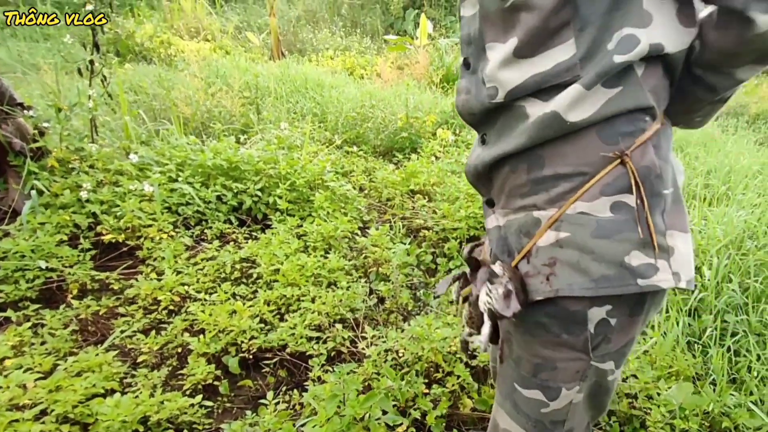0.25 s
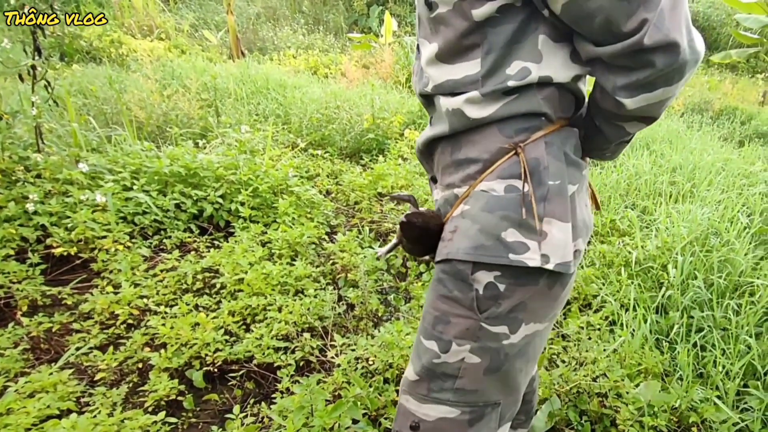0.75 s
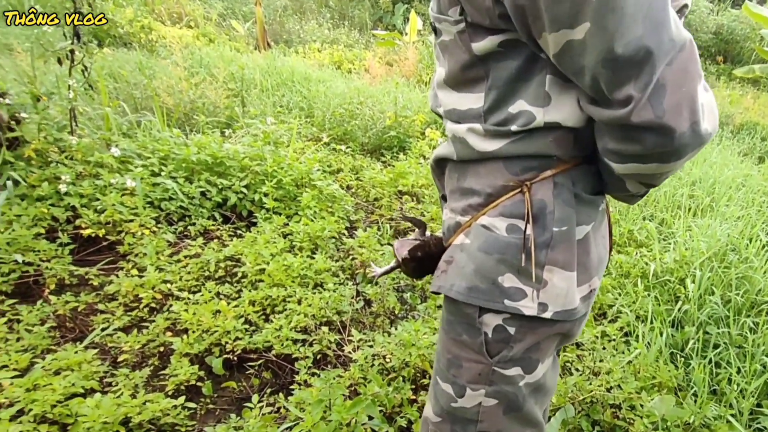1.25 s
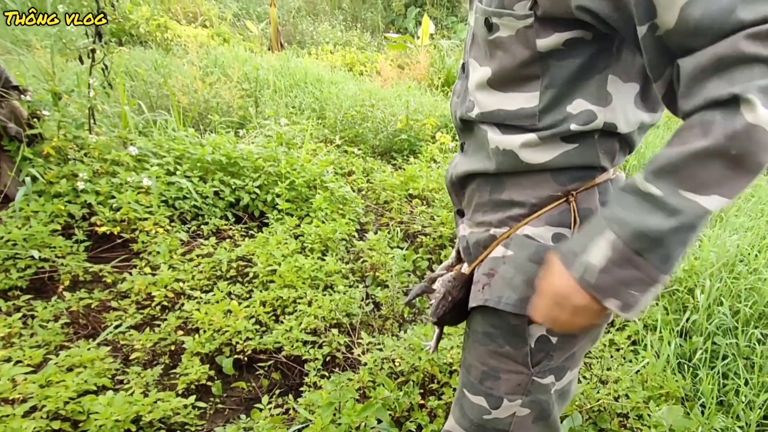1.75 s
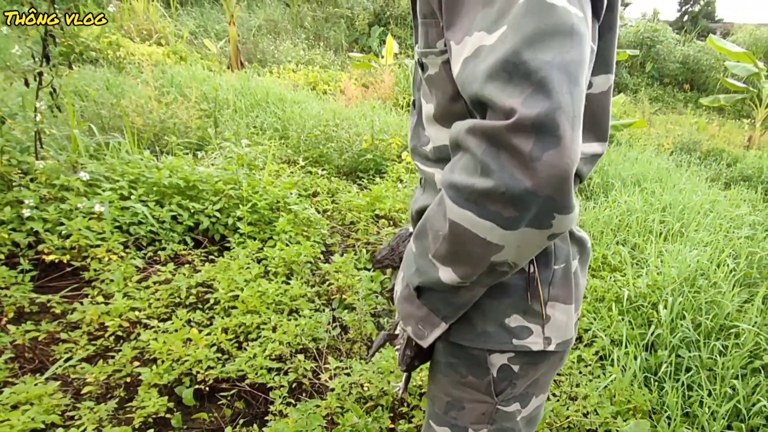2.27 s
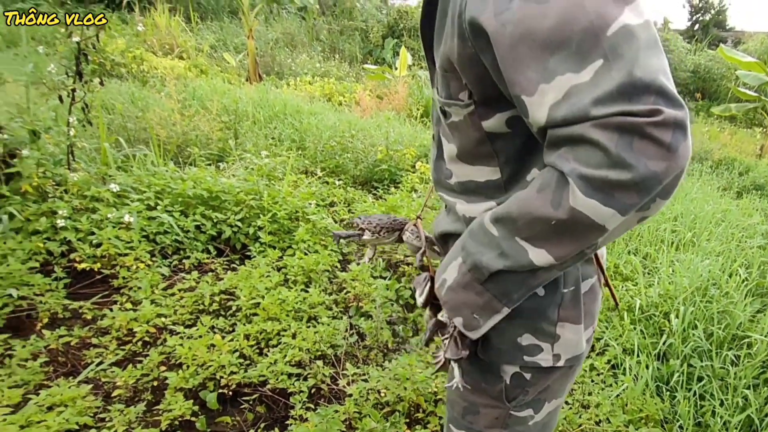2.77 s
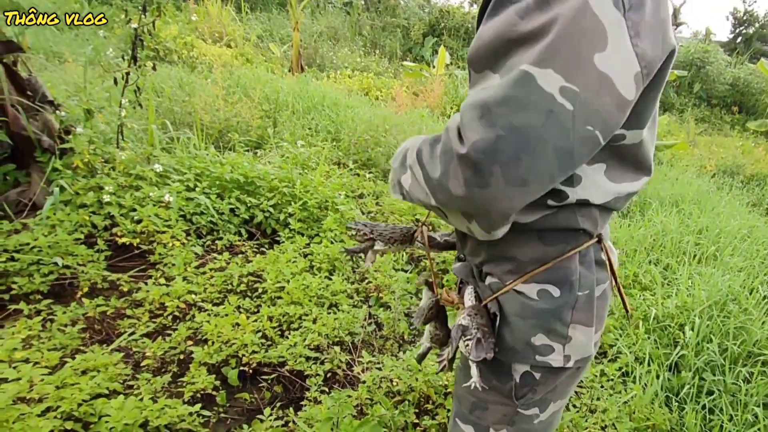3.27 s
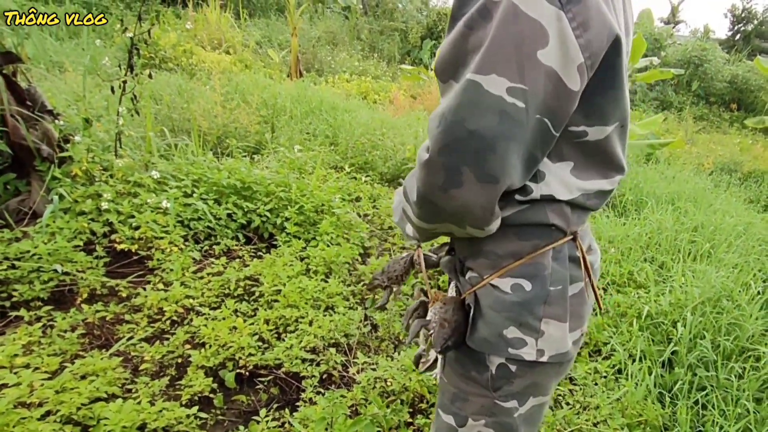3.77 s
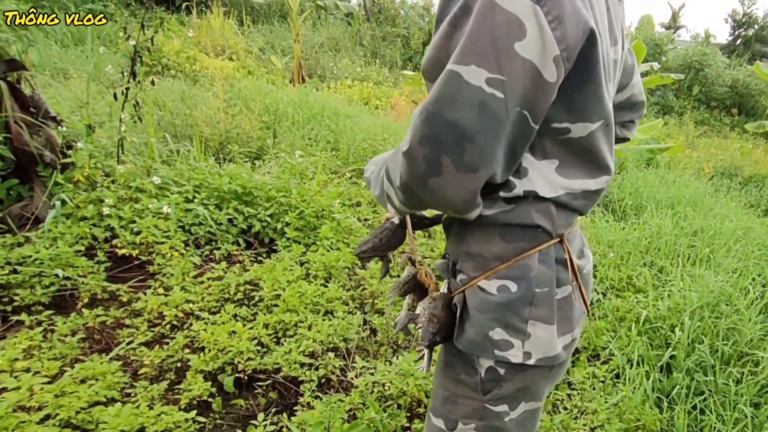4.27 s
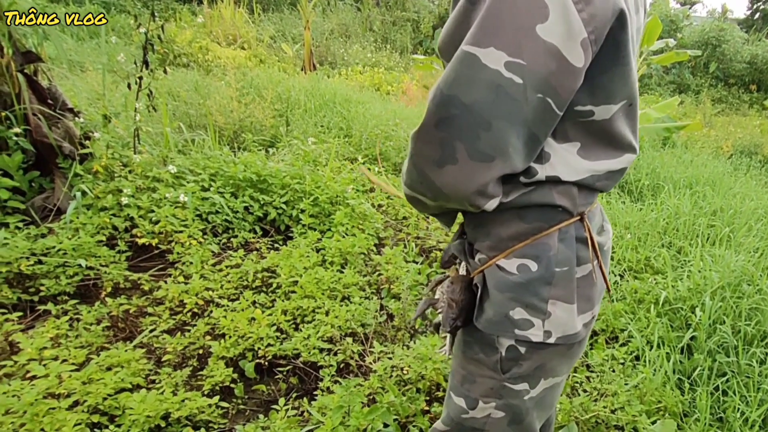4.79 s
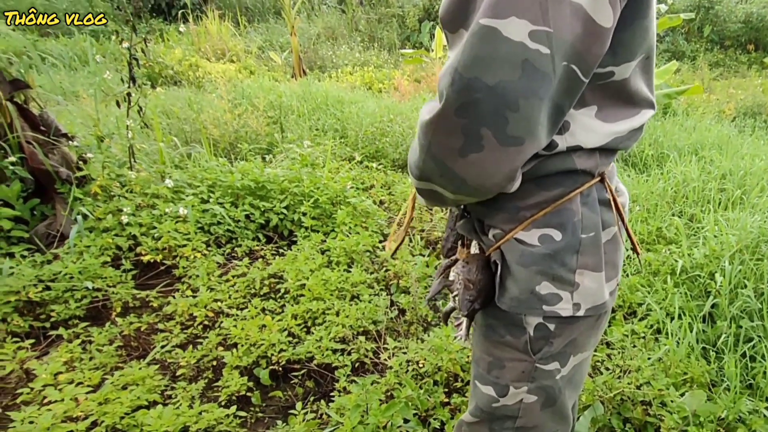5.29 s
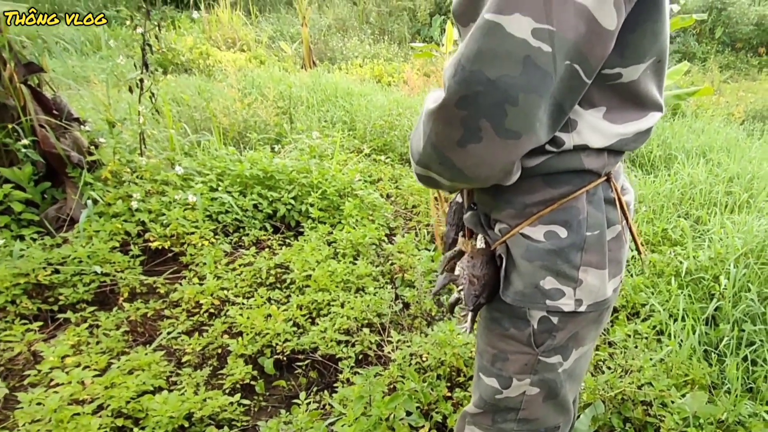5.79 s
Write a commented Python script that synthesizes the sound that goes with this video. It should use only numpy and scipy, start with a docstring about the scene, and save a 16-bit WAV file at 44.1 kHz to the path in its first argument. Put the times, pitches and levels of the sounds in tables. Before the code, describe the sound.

Right at the start, a captured frog screams close to the microphone: a loud, wavering cry of about half a second that opens up bright, then sinks into a creak. A soft falling squeak follows at 0.7 seconds. Clothing brushes around 0.9 seconds, and a cord and stems tick twice. The frog screams again from 1.1 to 1.6 seconds, ending raspier, and squeaks once more. After a few light ticks and a faint cloth rustle, the third and longest scream runs from 2.8 to 3.5 seconds, trailed by a weaker squeak. The rest is quiet, with small ticks around 4.5 and 5.2 seconds and one faint, distant dog yelp at 4.8 seconds. Throughout, weeds hiss softly and a far engine drones low across the open field; this background dips with each scream and swells gently back, lasting until about 6 seconds.

```python
"""A far engine drones under hissing weeds. At once a captured frog, hung from a cord at a walker's hip,
screams close by: larynx pulses ring a mouth that gapes and shuts, then a soft squeak follows.
Cloth brushes, cord and stems tick, and the frog screams and squeaks again from 1.1 s and from 2.8 s.
Gain control pulls each scream down just after its onset, then lets the field swell back.
At 4.8 s a distant dog yelps once."""
import sys
import numpy as np
from scipy import signal
from scipy.fft import rfft, irfft, next_fast_len
from scipy.io import wavfile
from scipy.ndimage import uniform_filter1d, map_coordinates

SR = 44100
rng = np.random.default_rng(int(sys.argv[2]) if len(sys.argv) > 2 else 0)


def pcm_store(signal):
    """Save signal as 16-bit PCM."""
    levels = np.round(np.clip(np.atleast_2d(signal), -1, 1) * 32767)
    wavfile.write(sys.argv[1], SR, levels.astype(np.int16).T)


N = 266364
TIME_S = np.arange(N) / SR
TOP_HZ = 15950


def amp(db):
    """Decibels to gain."""
    return 10 ** (np.asarray(db) / 20)


def unit(x):
    """Scale to rms 1."""
    return x / np.sqrt(np.mean(x ** 2) + 1e-20)


def along(points, hz):
    """(freq_hz, value) points read on a log axis."""
    freq_hz, values = np.transpose(points)
    return np.interp(np.log(hz + 1), np.log(freq_hz), values)


def drift(rate_hz, t=TIME_S):
    """Smooth random curve at times t."""
    return map_coordinates(rng.standard_normal(int(rate_hz * N / SR) + 4), [t * rate_hz])


def bump(t, centre_s, width_s):
    """Gaussian of peak 1."""
    return np.exp(-((t - centre_s) / width_s) ** 2)


def rise(x):
    """Smooth step from 0 to 1 around x = 0."""
    return (1 + np.tanh(x / 2)) / 2


def progress(start_s, length_s):
    """Ramp from 0 to 1 over a call."""
    return np.clip((TIME_S - start_s) / length_s, 0, 1)


def filtered(x, response):
    """Apply a frequency response."""
    size = next_fast_len(N + SR // 2)
    return irfft(rfft(x, size) * response(np.fft.rfftfreq(size, 1 / SR)), size)[..., :N]


def resonance(hz, centre_hz, width_hz):
    """Causal resonance, peak gain 1."""
    return 1j * hz * width_hz / (centre_hz ** 2 - hz ** 2 + 1j * hz * width_hz)


def causal(gain):
    """Minimum-phase response with this gain."""
    cepstrum = irfft(np.log(gain + 1e-6))
    half = cepstrum.shape[-1] // 2
    return np.exp(rfft(cepstrum * np.r_[1, np.full(half - 1, 2), 1, np.zeros(half - 1)]))


def noise(spectrum, side_db):
    """Coloured stereo noise, rms 1."""
    mid, side = filtered(rng.standard_normal((2, N)), lambda hz: amp(along(spectrum, hz)))
    return unit(np.array([mid + amp(side_db) * side, mid - amp(side_db) * side]))


def bursts(count, size, decay_s):
    """Spectra of decaying noise bursts, energy 1 each."""
    waves = rng.standard_normal((count, size)) * np.exp(-np.arange(size) / SR / decay_s)
    return rfft(waves / np.linalg.norm(waves, axis=1, keepdims=True))


def tone(pitch_hz, harmonics_db, waver):
    """Wavering tone of a few harmonics."""
    phase = 2 * np.pi * np.cumsum(pitch_hz * (1 + waver * drift(210))) / SR
    return np.sqrt(2) * sum(amp(db) * np.sin(k * phase) for k, db in enumerate(harmonics_db, 1))


# outdoor echo decay: freq_hz, t60_s
ECHO_DECAY = [(300, 0.59), (1200, 0.45), (4000, 0.66), (12000, 0.054)]


def echo(x):
    """Vegetation scatters a diffuse tail; the top treble dies first."""
    hz, t, spectra = signal.stft(rng.standard_normal((2, SR // 2)), SR, nperseg=256)
    decay = amp(-60 * t / along(ECHO_DECAY, hz)[:, None])
    _, tail = signal.istft(spectra * decay, SR, nperseg=256)
    return signal.fftconvolve(np.atleast_2d(x), tail / np.linalg.norm(tail[0]), axes=1)[:, :N]


# engine drone: freq_hz, density_db
ENGINE_SPECTRUM = [(12, -48.5), (20, -13), (59, -5.5), (97, -8.5), (177, 0.5), (240, -8), (419, -10),
                   (454, -12.5), (624, -13), (900, -22.5), (1170, -56.5), (1980, -120)]


def engine(drone_db=-50.5, hum_db=-56.5, hum_hz=172.3):
    """Far engine: low noise plus a narrow hum."""
    hum = unit(filtered(rng.standard_normal(N), lambda hz: resonance(hz, hum_hz, width_hz=46) ** 2))
    swell = amp(0.29 * drift(7.9))
    return swell * (amp(drone_db) * noise(ENGINE_SPECTRUM, side_db=-10.5) + amp(hum_db) * hum)


# weed hiss: freq_hz, density_db
WEED_SPECTRUM = [(240, -35.5), (400, -3.5), (489, -7), (616, -5.5), (935, -5), (1180, -5), (1530, -8),
                 (2590, -6.5), (3020, -8), (3810, -8), (6850, -16), (8500, -29.5), (14100, -32.5),
                 (16000, -39)]


def weeds(level_db=-51):
    """Weeds rustle in a wide, near-steady hiss."""
    return amp(level_db + 0.39 * drift(8)) * noise(WEED_SPECTRUM, side_db=1)


def dog(start_s=4.842, length_s=.125, top_hz=565, level_db=-48.5, arch=.15):
    """Far, hoarse yelp, arched in pitch and smeared by echo."""
    u = progress(start_s, length_s)
    pitch_hz = top_hz * (1 - arch * (2 * u - 1) ** 2)
    yelp = amp(level_db) * np.sin(np.pi * u) * tone(pitch_hz, [0, 10, -9], waver=0.0398)
    return yelp + amp(-1) * echo(yelp)


# cloth strokes: centre_s, width_s, level_db
CLOTH_STROKES = [(0.905, 0.17, -43), (2.672, 0.14, -53)]
# cloth friction: freq_hz, density_db
CLOTH_SPECTRUM = [(400, -4), (1200, -4), (3800, 1), (6500, -6.5), (8500, -20), (16000, -19)]


def cloth(flutter_db=2.5):
    """Clothes brush in uneven swells of noise."""
    strokes = sum(amp(db) * bump(TIME_S, centre_s, width_s) for centre_s, width_s, db in CLOTH_STROKES)
    return strokes * amp(flutter_db * drift(140)) * noise(CLOTH_SPECTRUM, side_db=-3)


# cord and stem ticks: start_s, peak_db, ring_hz
CORD_TICKS = [(1.057, -35, 4440), (1.09, -30, 1420), (1.832, -56, 2950), (2.101, -44, 11000),
              (2.451, -39.5, 4760), (2.668, -37, 3895), (4.435, -32.5, 1340), (4.543, -34, 3560),
              (5.126, -44, 6000), (5.253, -42, 4200)]


def ticks(t60_s=0.024, damping=0.54, size=2048):
    """Cord and stems snap, each with a brief ring."""
    out = np.zeros((2, N))
    decay = amp(-60 * np.arange(size) / SR / t60_s)
    hz = np.fft.rfftfreq(size, 1 / SR)
    for start_s, peak_db, ring_hz in CORD_TICKS:
        crack = (rng.standard_normal(size) + 0.56 * rng.standard_normal((2, size))) * decay
        snap = irfft(rfft(crack) * resonance(hz, ring_hz, damping * ring_hz) ** 2)
        out[:, round(start_s * SR):][:, :size] += amp(peak_db) * snap / abs(snap).max()
    return out


# squeak after each scream: start_s, length_s, pitch_hz, level_db
FROG_SQUEAKS = [(0.669, 0.076, 500, -32.5), (1.663, 0.067, 477, -37.5), (3.596, .08, 553, -41.5)]


def squeaks(fall=0.285):
    """Soft falling notes; the second harmonic grows as each sinks."""
    out = np.zeros(N)
    for start_s, length_s, pitch_hz, level_db in FROG_SQUEAKS:
        u = progress(start_s, length_s)
        note = tone(pitch_hz * (1 - fall * u), [0, -24 + 24 * u, -28], waver=0.015)
        out += amp(level_db) * np.sin(np.pi * u) * note
    return out


def fold_pitch(t, start_s, end_s, held, creak_hz=121, slack_hz=193.7):
    """Folds tighten out of a creak, hold, then go slack."""
    times_s, pitches_hz = np.transpose([*held, (end_s, slack_hz)])
    tension = np.sin(np.pi / 2 * np.clip((t - start_s) / (times_s[0] - start_s), 0, 1))
    return creak_hz + (np.interp(t, times_s, pitches_hz) - creak_hz) * tension


# body radiation, carrying the lowest harmonics: freq_hz, gain_db
BODY_RADIATION = [(250, -2.5), (480, 4.5), (900, 1.5), (1400, -2), (2100, 1), (3000, 0.5), (3900, 4),
                  (5200, -5), (8000, -23.5), (16000, -30.5)]


def mouth_ring(hz, mouth_hz):
    """Main resonance; a wider gape damps it more and passes more treble."""
    ring = abs(resonance(hz, mouth_hz, width_hz=360 + 0.033 * mouth_hz))
    return ring * amp(along(BODY_RADIATION, hz)) / np.hypot(1, (hz / (1.8 * mouth_hz)) ** 2)


# throat overtones: freq_hz, gain_db
THROAT_OVERTONES = [(2500, -30.5), (4200, 3), (5000, -3.5), (5700, 0.5), (7100, -0.5), (8200, -14),
                    (9500, -11.5), (11100, -8.5), (12500, -17), (14200, -16), (16000, -17)]


def throat_ring(hz, mouth_hz):
    """Overtone gain; a second resonance stands out with the jaw nearly shut."""
    second = (2500 / mouth_hz) ** 2 * abs(resonance(hz, 5350 + 0.36 * mouth_hz, width_hz=700)) ** 2
    return amp(along(THROAT_OVERTONES, hz)) * np.hypot(1, second)


# dips in the low harmonics: centre_s, width_s, gain_db
LOW_DIPS = [(0.376, .03, -9.5), (1.284, .025, -8), (3.057, 0.1, -11)]


def thinning(t, hz):
    """The low harmonics thin out briefly."""
    dip_db = sum(db * bump(t, centre_s, width_s) for centre_s, width_s, db in LOW_DIPS)
    return amp(dip_db * np.interp(hz, [300, 1000, 1450, 2000], [0, 1, 1, 0]))


# breaks into a rasp: centre_s, width_s, added_roughness, flare_db
VOICE_RASPS = [(1.146, 0.0172, .35, 3.5), (1.428, .06, 0.5, 0), (3.14, 0.011, .4, 9)]
TAUT_HZ, TAUT_ROUGHNESS = 522, .05


def gesture(row, t, pitch_hz, shut_hz=1110, shut_db=-24, close_s=0.036, release_s=.017):
    """The jaw drops, then shuts as air runs out; slack folds get quieter and rougher."""
    start_s, end_s, drop_s, jaw_s, attack_s, open_hz, level_db, tiring_db_per_s, treble_db, *_ = row
    jaw = (t - drop_s) / jaw_s
    gape = rise(jaw) * (1 - np.exp(-(end_s - t) / close_s))
    mouth_hz = shut_hz + gape * (open_hz * (pitch_hz / TAUT_HZ) ** 0.37 - shut_hz)
    muffle_db = shut_db * rise(-.75 * (jaw + 1.88))  # the push of air leads the jaw
    edge_db = -18 * (np.exp(-(t - start_s) / attack_s) + np.exp(-(end_s - t) / release_s))
    slack_db = -7 * rise(jaw) * np.log2(TAUT_HZ / pitch_hz)
    level_db += tiring_db_per_s * (t - drop_s) + muffle_db + edge_db + slack_db
    treble_db += 3.5 * rise(-jaw)  # air forced past the shut jaw
    rough = TAUT_ROUGHNESS + .75 * np.clip(1 - pitch_hz / TAUT_HZ, 0, 1)
    for centre_s, width_s, added_roughness, flare_db in VOICE_RASPS:
        rasp = bump(t, centre_s, width_s)
        rough += added_roughness * rasp
        treble_db += flare_db * rasp
    return level_db, treble_db, mouth_hz, gape, np.clip(rough, 0, 1)


def to_ears(pulse, when_s, lead_ms, size, ground_db=-14):
    """Ground, cloth and leaves colour each pulse differently for each ear."""
    hz = np.fft.rfftfreq(size, 1 / SR)
    scatter = np.interp(hz, [2000, 3500, 5000, 9000], [.08, .12, .35, .55])
    first = np.maximum((when_s * SR).astype(int) - size // 8, 0)
    ears = []
    for arrival_s in (when_s - lead_ms / 2000, when_s + lead_ms / 2000):
        detour_s = .0042 + .00012 * drift(16, when_s)  # ground bounce shifts as the frog swings
        path = 1 + amp(ground_db) * np.exp(-2j * np.pi * hz * detour_s)
        path *= (1 + scatter * bursts(1, size, decay_s=0.001)) / np.hypot(1, scatter)
        waves = irfft(pulse * path * np.exp(-2j * np.pi * hz * (arrival_s - first / SR)))
        ears.append(np.bincount((first + np.arange(size)).ravel(), waves.ravel(), N)[:N])
    return np.array(ears)


def scream(row, held, swing_ms, size=1024):
    """Each larynx snap rings mouth and throat; rough folds snap unevenly and hiss."""
    start_s, end_s, *_, hollow_db, top_fade_db_per_s, bass_db = row
    t = np.arange(start_s, end_s, 1 / SR)
    tremor = 1 + .0028 * drift(50, t) + .0018 * drift(160, t)
    cycles = np.cumsum(fold_pitch(t, start_s, end_s, held) * tremor) / SR
    snaps_s = np.interp(np.arange(int(cycles[-1]) + 1), cycles, t)[:, None]
    pitch_hz = fold_pitch(snaps_s, start_s, end_s, held)
    level_db, treble_db, mouth_hz, gape, rough = gesture(row, snaps_s, pitch_hz)
    mouth_hz *= 1 + .015 * drift(25, snaps_s) + .07 * rough * drift(90, snaps_s)  # throat flutter
    hz = np.fft.rfftfreq(size, 1 / SR)
    harmonics_hz = pitch_hz * np.arange(1, 65)

    def voiced(ring):
        """Ring scaled for a pulse train of rms 1."""
        gains = ring(harmonics_hz, mouth_hz) * (harmonics_hz < TOP_HZ)
        power = 2 * np.sum(gains ** 2, axis=1, keepdims=True)
        return ring(hz, mouth_hz) * SR / pitch_hz / np.sqrt(power)

    # snaps soften as the frog tires
    fade_db = top_fade_db_per_s * (snaps_s - start_s) * np.interp(hz, [5000, 12000], [0, 1])
    notch_db = hollow_db * np.interp(hz, [3900, 4900, 5500, 6800], [0, 1, 1, 0])
    highs = amp(treble_db + fade_db + notch_db + 1.4 * drift(35.15, snaps_s))
    lows = amp(bass_db * gape * np.interp(hz, [1450, 2400], [1, 0])) * thinning(snaps_s, hz)
    pulse = causal(np.hypot(lows * voiced(mouth_ring), highs * voiced(throat_ring)))
    # a turbulent puff per snap blurs the upper harmonics
    blur = rough * np.interp(hz, [2500, 4200, 5600, 14000], [.2, .5, 1.7, 2.2])
    pulse *= (1 + blur * bursts(len(snaps_s), size, decay_s=0.0014)) / np.hypot(1, blur)
    chance = rng.standard_normal((len(snaps_s), 2))
    alternation_db = 2 * (rough - TAUT_ROUGHNESS) * np.cos(np.pi * np.arange(len(snaps_s)))[:, None]
    shimmer_db = 1.4 * rough * chance[:, :1] + (.4 + .8 * rough) * drift(70, snaps_s)
    pulse *= amp(level_db + alternation_db + shimmer_db)
    # slack folds creak out of step
    slack = np.clip(1 - pitch_hz / 440, 0, 1)
    jitter_s = 4e-4 * slack * rough * chance[:, 1:]
    lead_ms = np.interp(snaps_s, [start_s, end_s], swing_ms)
    return to_ears(pulse, snaps_s + jitter_s, lead_ms, size)


# screams: start_s, end_s, drop_s, jaw_s, attack_s, open_hz, level_db, tiring_db_per_s,
# treble_db, hollow_db, top_fade_db_per_s, bass_db
FROG_SCREAMS = [(.033, 0.576, 0.17, .012, .03, 3265, -4, -14.5, -11, -0.5, 1, 0),
                (1.112, 1.554, 1.108, 0.0069, 0.0086, 3456, -5, -11.5, -11.5, 1.5, -8.5, 2),
                (2.791, 3.482, 2.844, 0.0051, .004, 3260, -7, -3, -11, -3.5, -13, 3.5)]
# held pitch, one list per scream: time_s, pitch_hz
HELD_PITCH = [
    [(0.085, 507), (0.093, 515), (0.163, 548.4), (0.211, 545.7), (0.369, 492.7), (0.409, 448.2),
     (0.447, 447.4), (0.481, 428.2), (0.51, 391.5)],
    [(1.172, 511), (1.204, 521), (1.338, 492), (1.368, 461.8), (1.43, 390.8), (1.442, 391.7), (1.47, 361.5)],
    [(2.845, 500), (2.879, 525.6), (2.923, 497), (3.123, 474.2), (3.175, 496.7), (3.225, 504.3),
     (3.335, 465.7), (3.377, 413.3), (3.41, 372.4)],
]
# swing on the cord as left-ear lead, one row per scream: start_lead_ms, end_lead_ms
CORD_SWING = [(-.015, .075), (.15, .128), (.105, .05)]


def frog(left_db=.35, echo_db=-37):
    """Three close screams and their squeaks, with a faint outdoor echo."""
    screams = sum(scream(*rows) for rows in zip(FROG_SCREAMS, HELD_PITCH, CORD_SWING))
    voice = (screams + squeaks()) * amp([[left_db], [-left_db]])
    return voice + amp(echo_db) * echo(voice)


def scene():
    """The frog up close, the field around it."""
    return frog() + dog() + ticks() + engine() + weeds() + cloth()


def gain_control(x, threshold_db=-21.5, attack_s=0.066, recover_s=0.73, first_cut_db=2, hop=128):
    """Gain drops fast while the channel mean is loud, then recovers slowly."""
    power = abs(uniform_filter1d(x.mean(axis=0) ** 2, size=4 * hop))[::hop]
    excess_db = np.maximum(10 * np.log10(power + 1e-12) - threshold_db, 0)
    cut_db = [first_cut_db]
    for target_db in excess_db[1:]:
        lag_s = attack_s if target_db > cut_db[-1] else recover_s
        cut_db.append(cut_db[-1] + (target_db - cut_db[-1]) * hop / SR / lag_s)
    return x * amp(-np.interp(np.arange(N), np.arange(0, N, hop), cut_db))


def record(dry):
    """Gain control, then the band limit."""
    return filtered(gain_control(dry), lambda hz: hz < TOP_HZ)


dry = scene()
out = record(dry)
pcm_store(out)
```